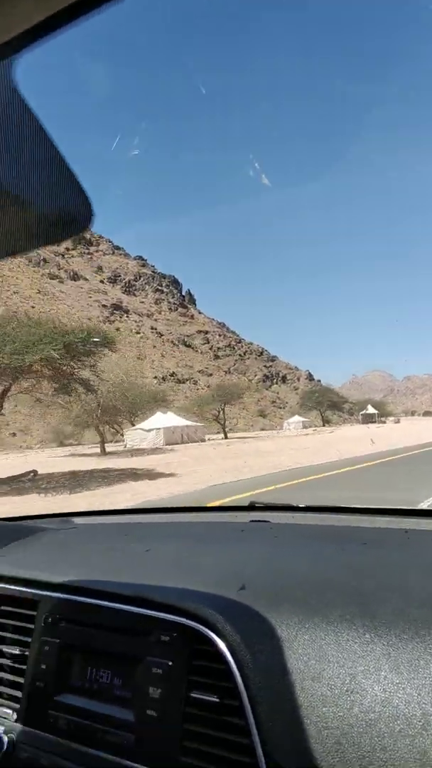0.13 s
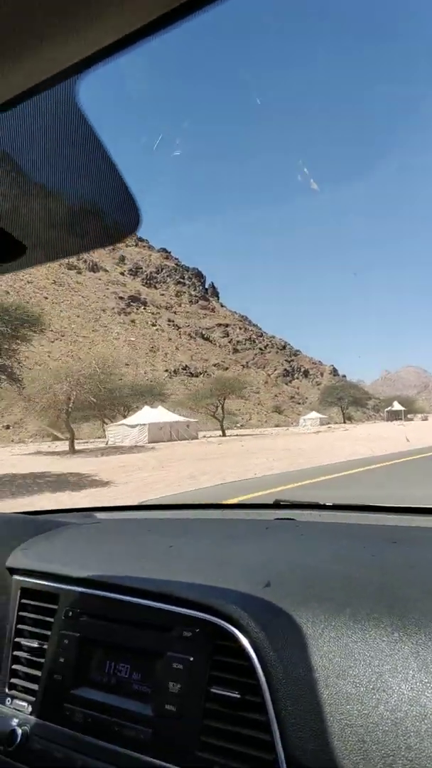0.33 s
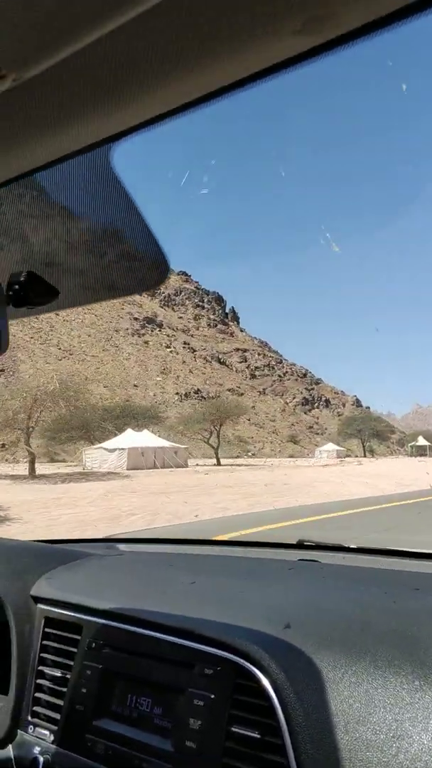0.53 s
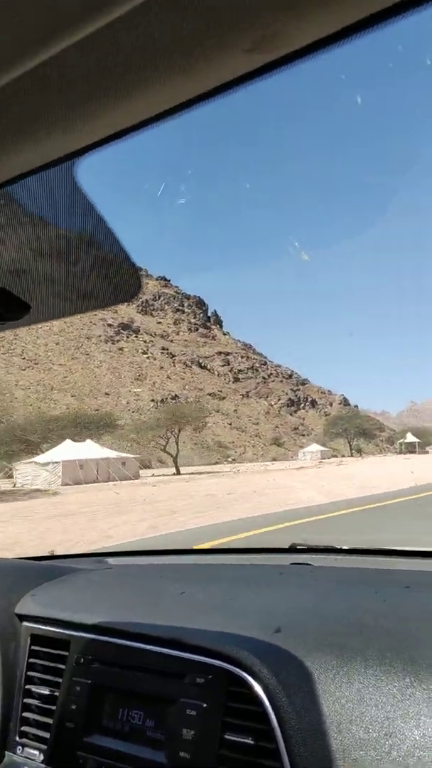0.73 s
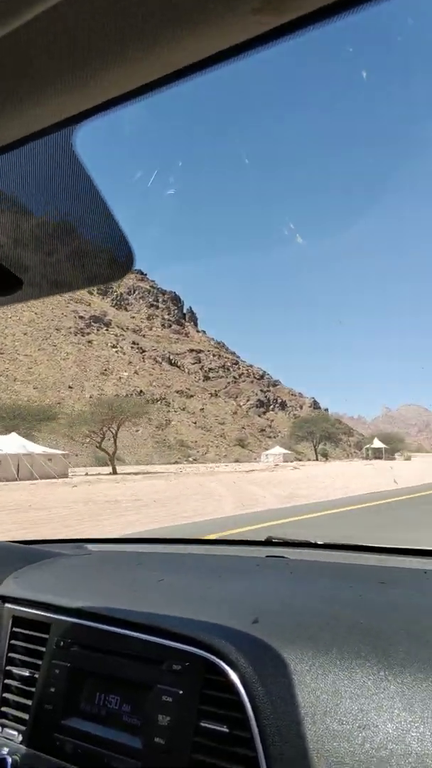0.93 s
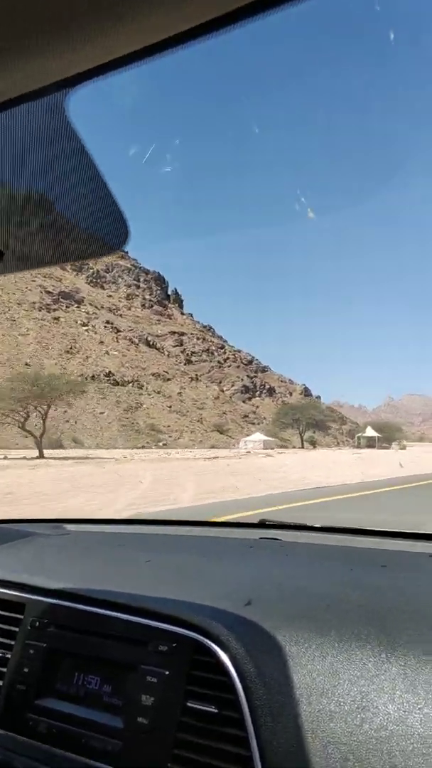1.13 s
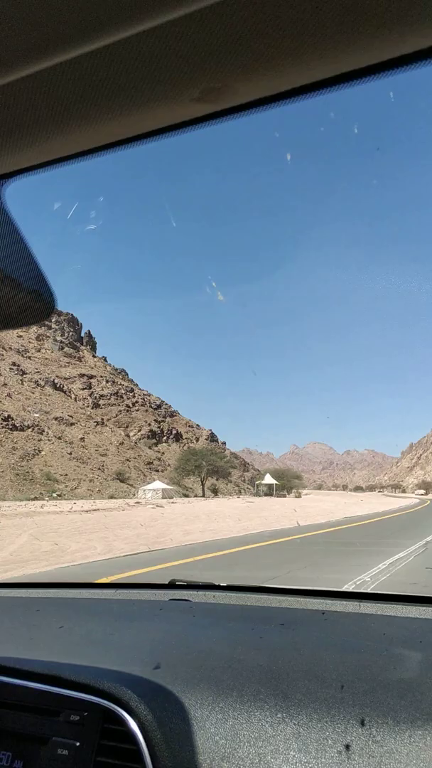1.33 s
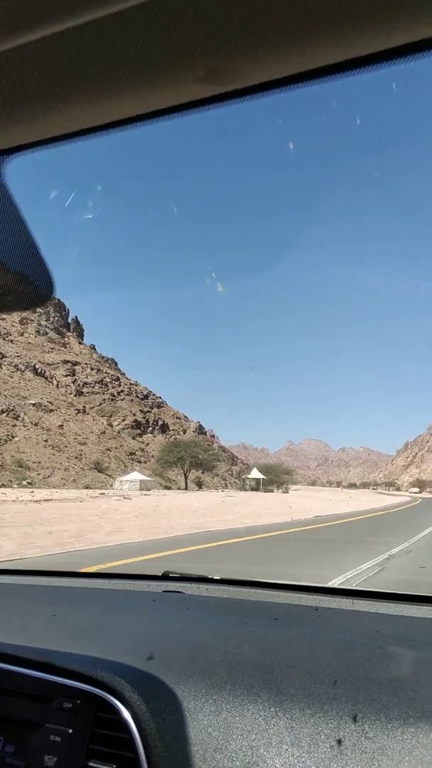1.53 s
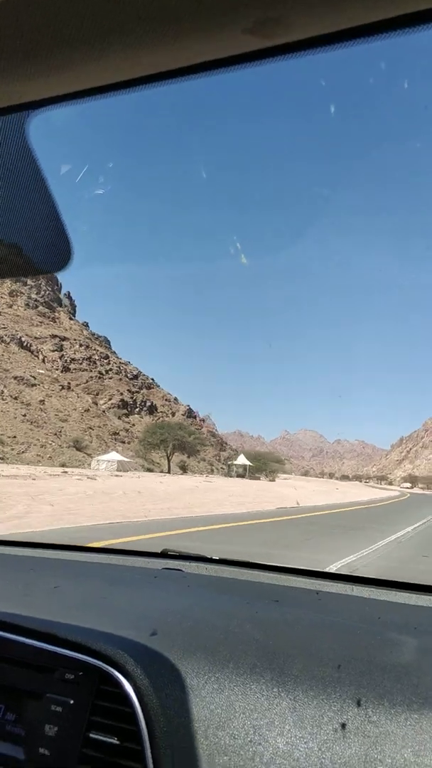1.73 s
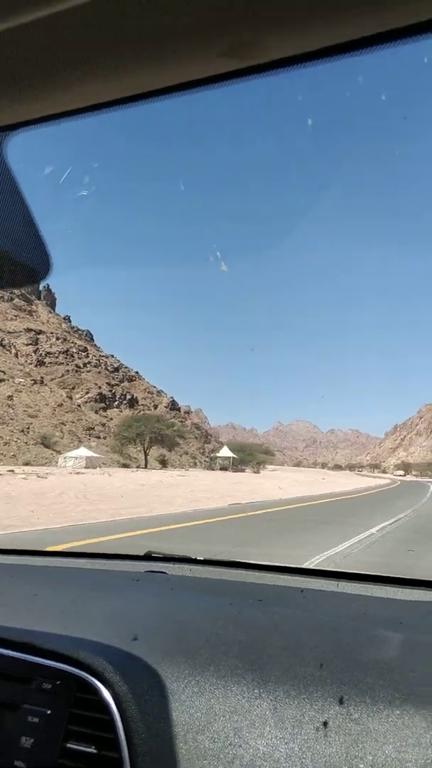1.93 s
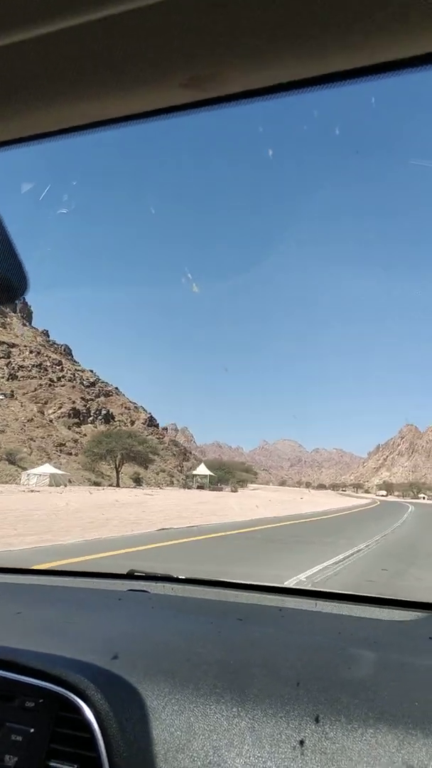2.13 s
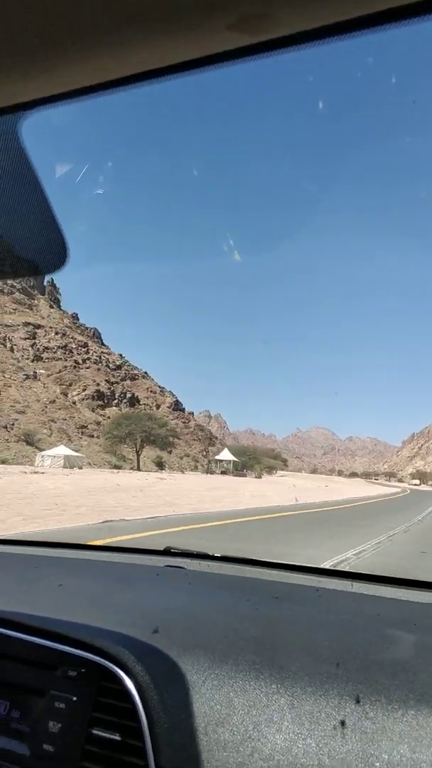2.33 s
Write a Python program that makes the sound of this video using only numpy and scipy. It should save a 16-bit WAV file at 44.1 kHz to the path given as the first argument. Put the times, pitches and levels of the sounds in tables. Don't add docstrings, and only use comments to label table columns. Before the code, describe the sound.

Deep, uneven low rumble inside a car cabin driving steadily along a paved road

```python
import sys
import numpy as np
from scipy import signal
from scipy.fft import rfft, irfft, next_fast_len
from scipy.io import wavfile
from scipy.ndimage import uniform_filter1d, minimum_filter1d, map_coordinates

SR = 44100
rng = np.random.default_rng(int(sys.argv[2]) if len(sys.argv) > 2 else 0)


def bounce(signal):
    frames = np.transpose(np.atleast_2d(signal))
    limited = np.clip(frames, -1, 1)
    pcm = np.round(limited * 32767).astype(np.int16)
    wavfile.write(sys.argv[1], SR, pcm)


def voltage_ratio(level):
    return 10 ** (np.asarray(level, float) / 20)


N = 105178
TIME_S = np.arange(N) / SR
LEFT_RIGHT = np.array([[.5], [-.5]])


def pan(left_over_right_db):
    return voltage_ratio(LEFT_RIGHT * left_over_right_db)


def unit(x):
    return x / np.sqrt(np.mean(x ** 2) + 1e-20)


def along(points, hz):
    point_hz, value = np.transpose(points)
    return np.interp(np.log(hz + 1), np.log(point_hz + 1), value)


def curve(points):
    return np.interp(TIME_S, *np.transpose(points))


def wobble(rate_hz):
    knots = rng.standard_normal(int(N * rate_hz / SR) + 4)
    return map_coordinates(knots, [np.arange(N) * rate_hz / SR])


def filtered(x, response):
    size = next_fast_len(N + SR // 2)
    spectrum = rfft(x, size) * response(np.fft.rfftfreq(size, 1 / SR))
    return irfft(spectrum, size)[..., :N]


def colour(points):
    low, high = (points[0][0] / 2, -120), (points[-1][0] * 2, -120)
    return lambda hz: voltage_ratio(along([low] + list(points) + [high], hz))


def modes(table):
    def response(hz):
        power = 0
        for centre_hz, width_hz, level_db in table:
            resonance = hz * width_hz / (centre_hz ** 2 - hz ** 2 + 1j * hz * width_hz)
            power = power + voltage_ratio(level_db) ** 2 * np.abs(resonance) ** 4
        return np.sqrt(power)
    return response


# pitch_hz, correlation
LIKENESS = [(60, 1), (100, 0.98), (180, 1), (310, 0.8), (530, 0.097), (920, 0.58), (1580, -0.33),
            (2730, 0.51)]


def pair(gain):
    def mid_side(hz):
        turn = np.arccos(np.clip(along(LIKENESS, hz), -1, 1)) / 2
        return gain(hz) * [np.cos(turn), np.sin(turn)]
    mid, side = filtered(rng.standard_normal((2, N)), mid_side)
    return unit(np.array([mid + side, mid - side]))


def orders(base_hz, table, drift, sway_db, lag_rad):
    turns = np.cumsum(base_hz * (1 + drift * wobble(1.5))) / SR
    start_rad = rng.uniform(0, 2 * np.pi, (len(table), 2))
    out = 0
    for (order, level_db), (phase, lean) in zip(table, start_rad):
        port_lag = LEFT_RIGHT * lag_rad * order * np.sin(lean)
        tone = np.sin(2 * np.pi * round(order) * turns + phase + port_lag)
        out = out + np.sqrt(2) * voltage_ratio(level_db + sway_db * wobble(3)) * tone
    return out


# pitch_hz, level_db
HISS = [(2500, -15.5), (3500, -16), (5000, -6), (6200, -4.5), (8500, -3.5), (11000, -9), (14000, -11),
        (16000, -17)]


def microphone_hiss():
    return voltage_ratio(-67 + 1.6 * wobble(2.5)) * pair(colour(HISS))


# pitch_hz, level_db
WIND = [(900, -35.5), (1400, 0), (2200, -1), (2700, -6.5), (3000, -12.5), (4000, -18), (5000, -25.5),
        (6000, -38.5)]


def wind():
    return voltage_ratio(-56.5 + .45 * wobble(3.5)) * pan(4.5) * pair(colour(WIND))


# pitch_hz, level_db_per_hz
TYRES = [(60, -13.5), (150, -14.5), (230, -28), (330, -30.5), (500, -35), (760, -41.5), (930, -42.5),
         (1300, -50.5)]


def tyre_roar():
    return voltage_ratio(-29.5 + .45 * wobble(3.3)) * pair(colour(TYRES))


# order, level_db
ENGINE = [(7, -45), (8, -45), (9, -53), (11, -50), (12, -55), (13, -56), (14, -56), (15, -56), (16, -52),
          (17, -58), (20, -65), (21, -63), (22, -67), (23, -66), (24, -67), (26, -68), (27, -66), (28, -65),
          (29, -70), (32, -62), (33, -71), (34, -72), (36, -63)]


def driveline():
    return orders(25.15, ENGINE, drift=.0008, sway_db=2, lag_rad=.04)


# start_s, length_s, level_db
RUSTLE = [
    (.16, .13, -64),
    (.42, .16, -67),
    (1.21, .13, -70),
]
# pitch_hz, level_db_per_hz
CLOTH = [(3000, -35), (5000, 0.5), (8500, 0.5), (11000, -1.5), (14500, -5.5), (16000, -5)]


def fabric_rustle():
    rub = 0
    for start_s, length_s, level_db in RUSTLE:
        progress = np.clip((TIME_S - start_s) / length_s, 0, 1)
        rub = rub + voltage_ratio(level_db) * np.sin(np.pi * progress) ** .6
    return rub * pair(colour(CLOTH))


# start_s, level_db
SNAPS = [
    (.284, -46),
    (.414, -49),
    (.676, -48),
    (1.503, -55),
]
# pitch_hz, width_hz, level_db
SNAP_RING = [
    (8800, 5000, 0),
]


def fabric_snaps():
    snap = 0
    for start_s, level_db in SNAPS:
        decay_db = 60 * np.maximum(TIME_S - start_s, 0) / .037
        snap = snap + voltage_ratio(level_db - 8.5 - decay_db) * (TIME_S >= start_s)
    return snap * pair(modes(SNAP_RING))


# start_s, level_db, pan_db, panel_db, clip_db
TICKS = [
    (1.4865, -42, 12, -14, 0),
    (1.5022, -37, 6, 0, -8),
    (1.5085, -42, 6, 0, -8),
]
# pitch_hz, level_db, t60_s, is_panel (1 panel, 0 clip)
TRIM = [
    (2040, -7, .022, 0),
    (2330, 0, .024, 1),
    (2700, -5, .022, 0),
    (3350, -11, .018, 1),
]


def trim_ticks():
    out = np.zeros((2, N))
    for start_s, level_db, pan_db, panel_db, clip_db in TICKS:
        age_s = np.maximum(TIME_S - start_s, 0)
        ring = 0
        for pitch_hz, mode_db, t60_s, is_panel in TRIM:
            mode_db = mode_db + (panel_db if is_panel else clip_db)
            ring = ring + voltage_ratio(mode_db - 60 * age_s / t60_s) * np.sin(2 * np.pi * pitch_hz * age_s)
        rise = 1 - np.exp(-age_s / .001)
        out += voltage_ratio(level_db) * pan(pan_db) * rise * ring
    return out


# pitch_hz, width_hz, level_db
PANELS = [(177.8, 18, 1.5), (200, 11, -6), (252, 11, -6), (271, 54, -12.5)]


def floor_panels(boom_db):
    follow_db = .5 * (boom_db - boom_db.mean())
    return voltage_ratio(-36 + follow_db + .7 * wobble(11)) * pair(modes(PANELS))


def steadied(x, share):
    settle = int(.09 * SR)
    power = uniform_filter1d(uniform_filter1d(x.mean(0) ** 2, size=settle), size=settle)
    x = unit(x / (np.sqrt(np.abs(power)) + .05))
    padded = np.pad(x.mean(0), 8192, "reflect")
    envelope = np.abs(signal.hilbert(padded))[8192:-8192]
    return unit(x / (envelope + .17) ** share)


# pitch_hz, width_hz, level_db
HEAVE = [(13.8, 14, -6), (26, 23, -12.5), (36, 13, -1.5), (46, 4.7, -6)]
# order, level_db
HOP = [(3, -3), (4, -9), (5, -17)]
# time_s, level_db
SWELL = [(0.0, -27), (0.03, -22.5), (0.38, -25), (0.4, -16.5), (0.48, -27), (0.66, -17), (1.16, -22.5),
         (1.24, -17), (1.32, -25.5), (1.34, -16), (1.68, -16.5), (1.84, -31), (1.87, -21.5), (1.9, -30.5),
         (2.12, -19.5), (2.27, -29), (2.28, -25), (2.38, -24.5)]


def body_heave():
    drive = pair(modes(HEAVE)) + orders(12.2, HOP, drift=.002, sway_db=1.5, lag_rad=.01)
    return voltage_ratio(curve(SWELL)) * steadied(drive, .39)


# pitch_hz, width_hz, level_db
BOOM = [(91.5, 20, -10.5), (98.3, 14, -2), (109.1, 9, -0.5), (124.1, 15, -4), (134.6, 15, -6.5)]
# order, level_db
THRUM = [(6, -22), (7, -14), (8, -7), (9, -1), (10, -16), (11, -14), (12, -19)]


def cabin_boom(boom_db):
    thrum = orders(12.2, THRUM, drift=.002, sway_db=1.5, lag_rad=.01)
    return voltage_ratio(boom_db) * steadied(voltage_ratio(-1.5) * pair(modes(BOOM)) + thrum, .38)


# start_s, buzz_db, pan_db
JOINTS = [(.6015, -53, 0), (.6665, -52, 0), (1.1805, -46, 0), (1.4525, -53, 1), (1.492, -59, 0),
          (1.564, -54, 0), (1.579, -56, -1), (1.666, -58, 0), (2.2945, -50, 6), (2.377, -59, 3),
          (.709, -61, 0), (1.374, -61, 0)]
PUSH = [(-1, .35), (1, .8), (1, .35), (1, .75), (-1, .15), (-1, .2), (1, .4), (-1, .5), (1, .5), (1, .15),
        (-1, .3), (1, .4)]


def joint_pushes(body):
    for (start_s, buzz_db, _), (sign, heave_share) in zip(JOINTS, PUSH):
        age_s = TIME_S - start_s - .002
        bump = np.exp(-(age_s / .013) ** 2 / 2)
        heave = heave_share * np.cos(2 * np.pi * 36 * age_s)
        boom = (1 - heave_share) * np.cos(2 * np.pi * 105 * age_s)
        push = sign * voltage_ratio(-7 + .2 * (buzz_db + 50)) * (heave + boom)
        body = body * (1 - .85 * bump) + bump * push
    return body


# time_s, level_db
BOOMING = [(0.0, -22.5), (0.27, -17), (0.32, -24.5), (0.35, -14), (0.52, -20.5), (0.6, -17), (0.64, -25),
           (0.71, -15), (0.75, -23), (0.95, -17.5), (0.98, -21), (1.19, -17.5), (1.31, -22.5),
           (1.51, -15.5), (1.93, -22), (2.31, -19), (2.34, -21), (2.38, -12.5)]


def road():
    boom_db = curve(BOOMING)
    return joint_pushes(body_heave() + cabin_boom(boom_db)) + floor_panels(boom_db)


def scene():
    rush = microphone_hiss() + wind() + tyre_roar()
    cabin_bits = fabric_rustle() + fabric_snaps() + trim_ticks()
    return rush + cabin_bits + (driveline() + road()) * pan(.7)


def gain_steps():
    step_hz, step_s = 6000, .0005
    tone = np.sin(2 * np.pi * step_hz * TIME_S) + voltage_ratio(-5) * np.sin(4 * np.pi * step_hz * TIME_S)
    out = 0
    for start_s, buzz_db, pan_db in JOINTS:
        burst = np.exp(-((TIME_S - start_s - step_s) / step_s) ** 2 / 2)
        out = out + voltage_ratio(buzz_db) * pan(pan_db) * burst * tone
    return out


def band_limit(x):
    return signal.sosfilt(signal.butter(12, 15770, fs=SR, output="sos"), x)


def record(dry):
    need = np.minimum(1, .57 / (np.abs(dry).max(0) + 1e-9))
    gain = uniform_filter1d(minimum_filter1d(need, size=441), size=441)
    end_fade = np.sin(np.pi / 2 * np.minimum(1, TIME_S[::-1] / .003))
    gain = gain * end_fade
    offset = np.exp(-(TIME_S / .004) ** 2) * (.09 - dry[:, :1] * gain[0])
    mix = dry * gain + offset + gain_steps()
    return band_limit(mix)


dry = scene()
out = record(dry)
bounce(out)
```